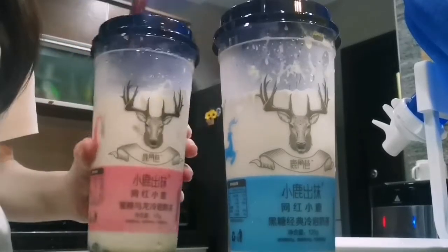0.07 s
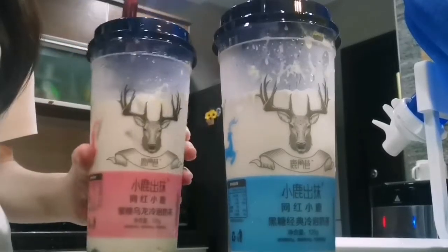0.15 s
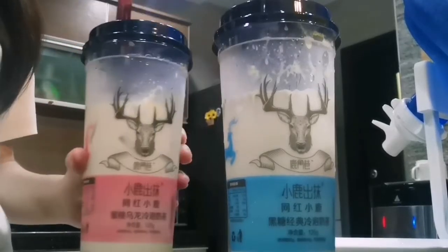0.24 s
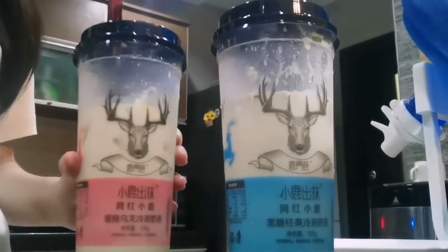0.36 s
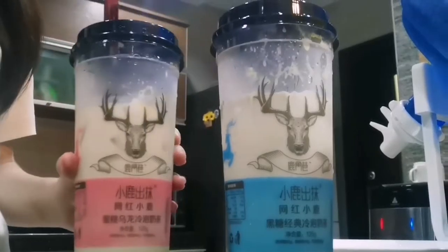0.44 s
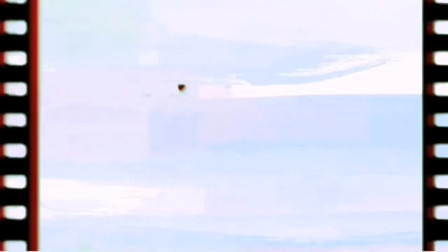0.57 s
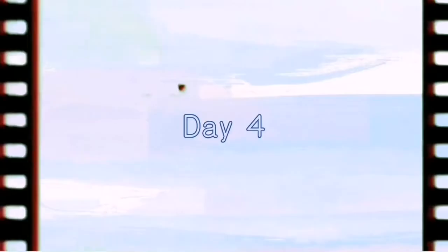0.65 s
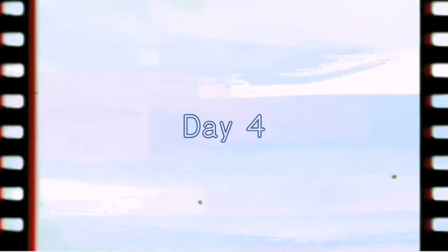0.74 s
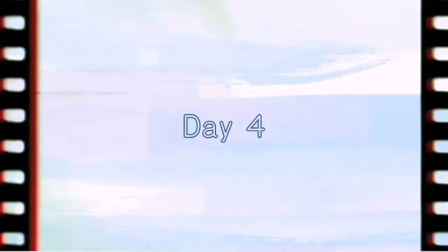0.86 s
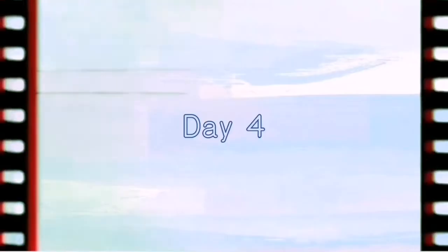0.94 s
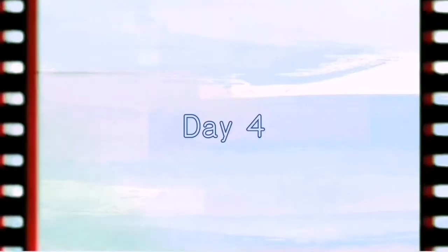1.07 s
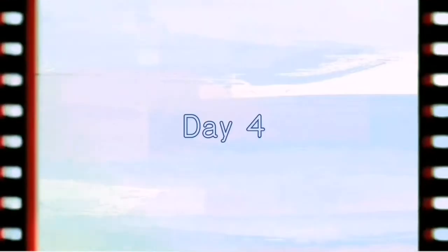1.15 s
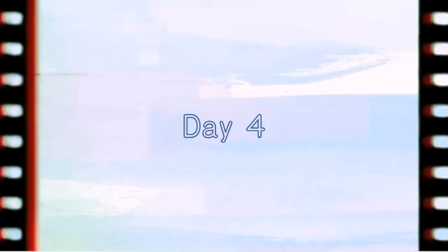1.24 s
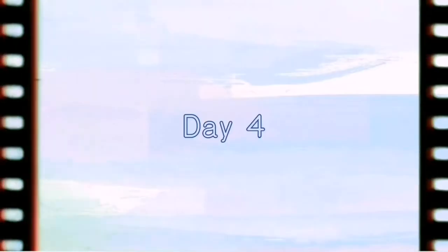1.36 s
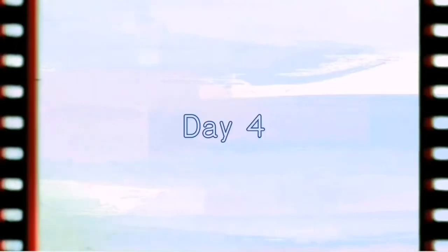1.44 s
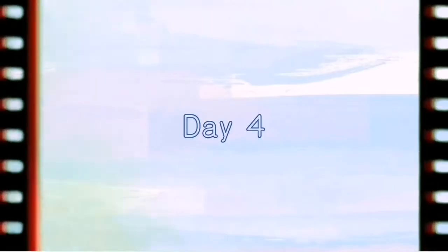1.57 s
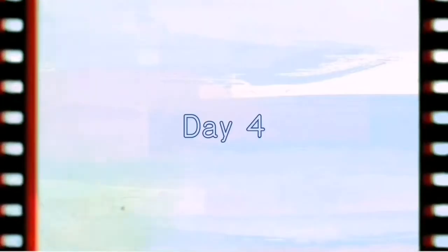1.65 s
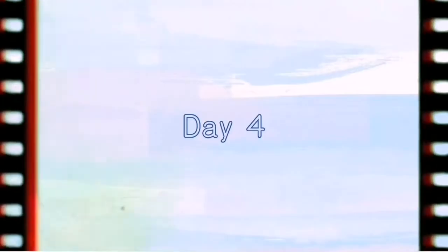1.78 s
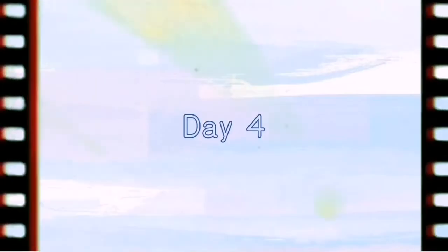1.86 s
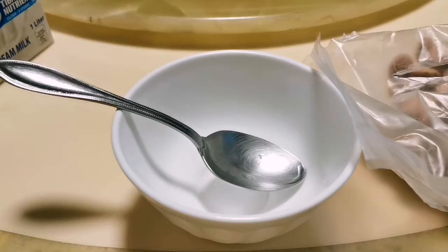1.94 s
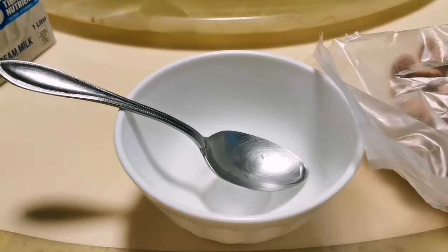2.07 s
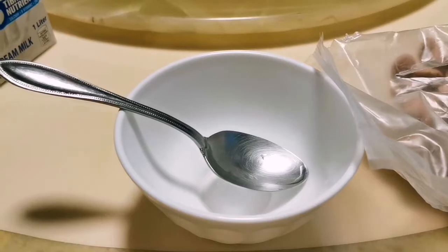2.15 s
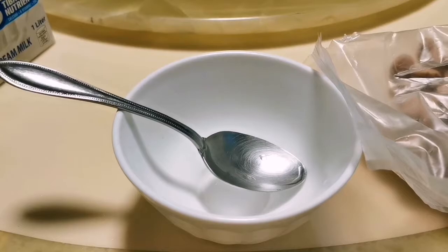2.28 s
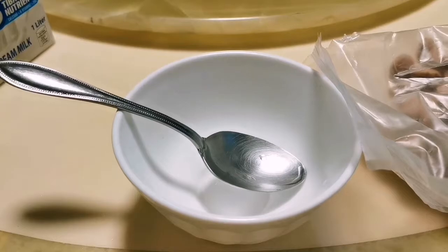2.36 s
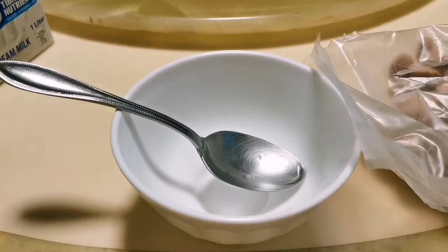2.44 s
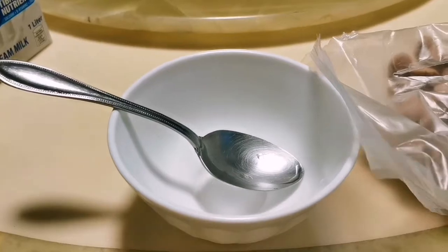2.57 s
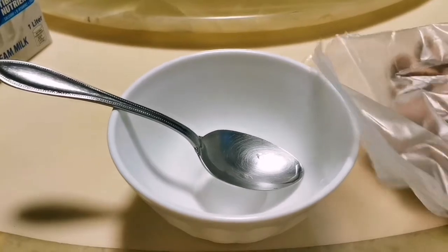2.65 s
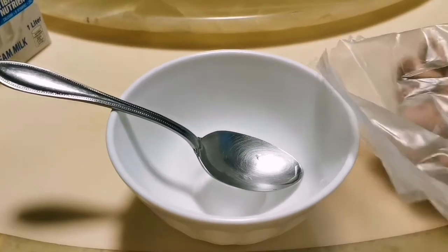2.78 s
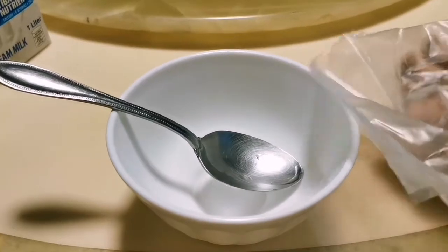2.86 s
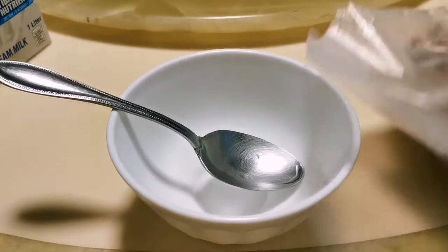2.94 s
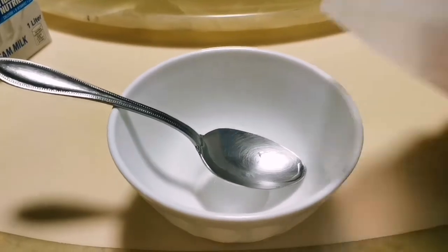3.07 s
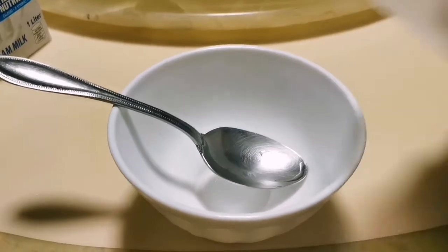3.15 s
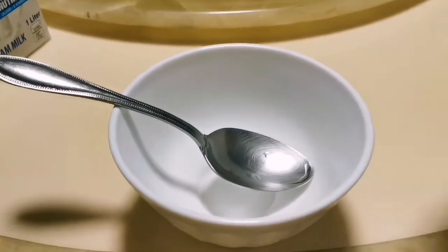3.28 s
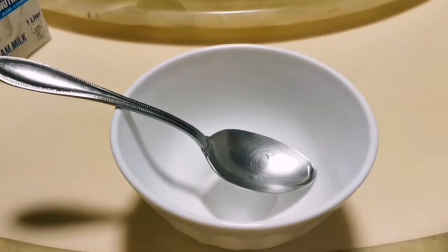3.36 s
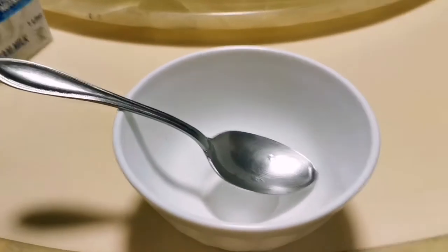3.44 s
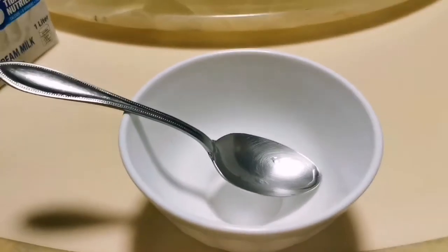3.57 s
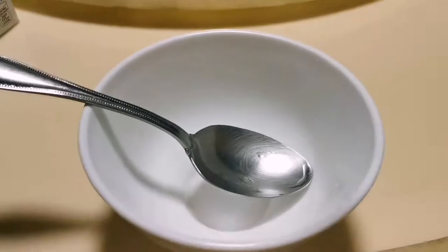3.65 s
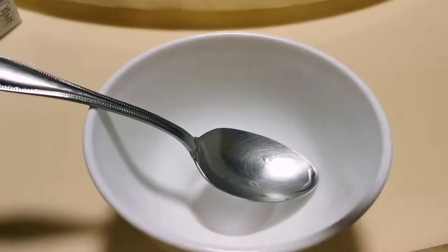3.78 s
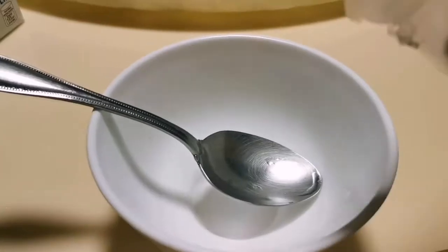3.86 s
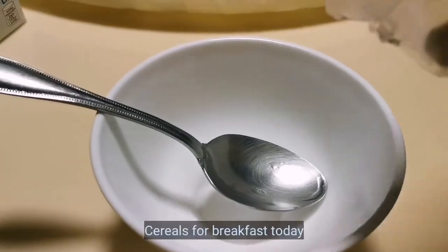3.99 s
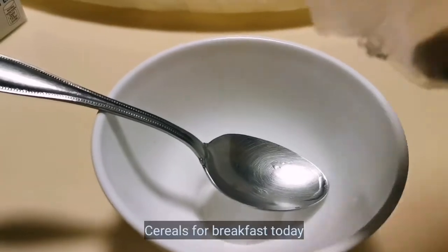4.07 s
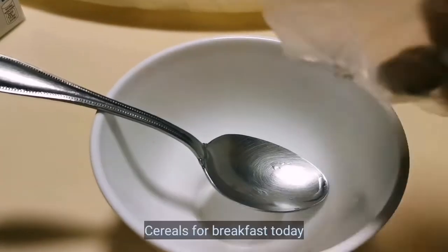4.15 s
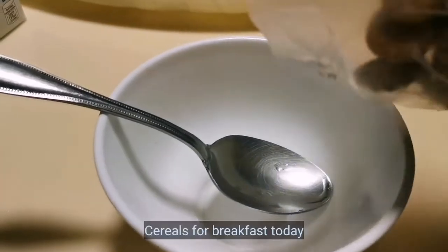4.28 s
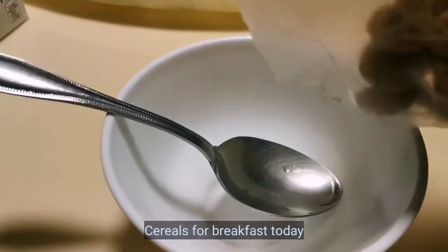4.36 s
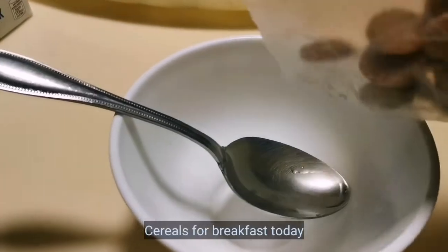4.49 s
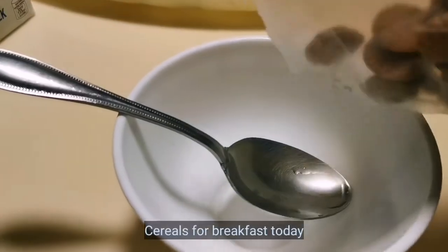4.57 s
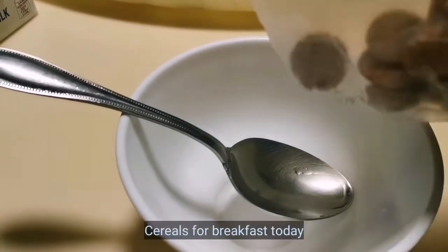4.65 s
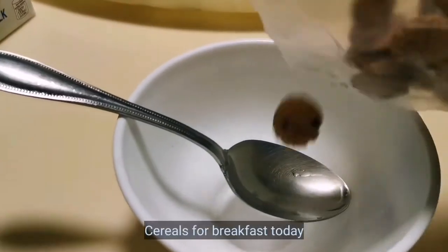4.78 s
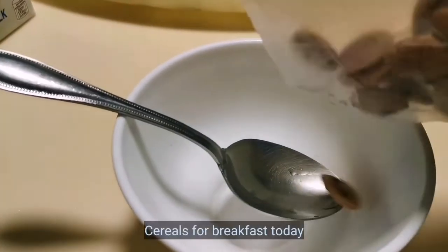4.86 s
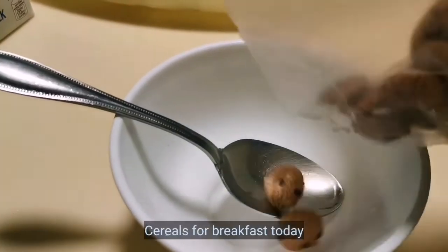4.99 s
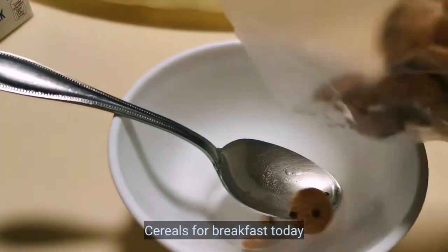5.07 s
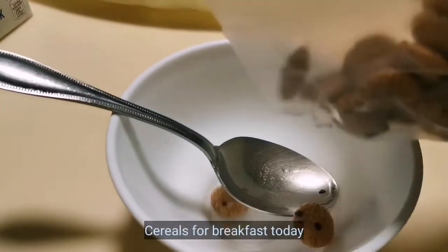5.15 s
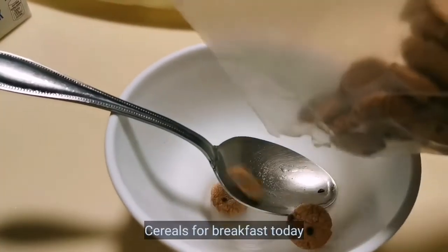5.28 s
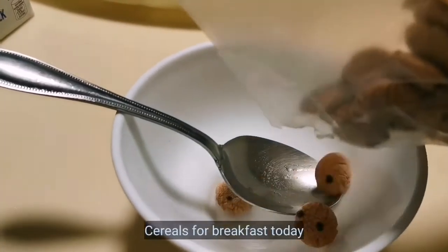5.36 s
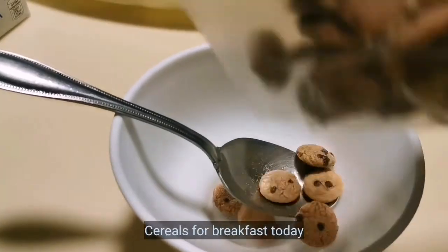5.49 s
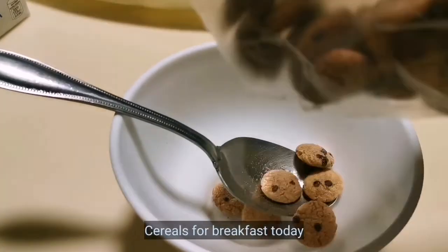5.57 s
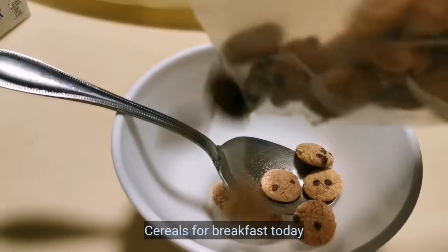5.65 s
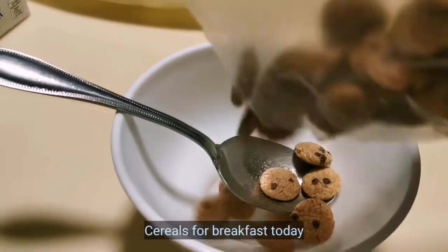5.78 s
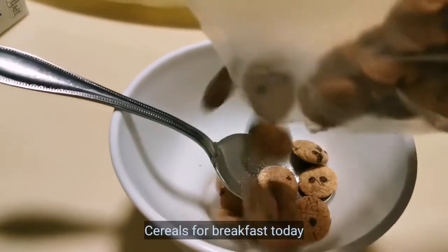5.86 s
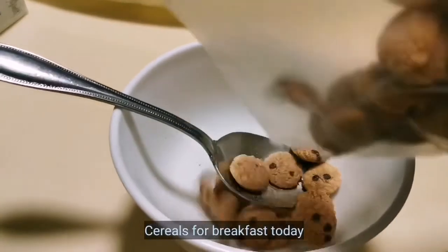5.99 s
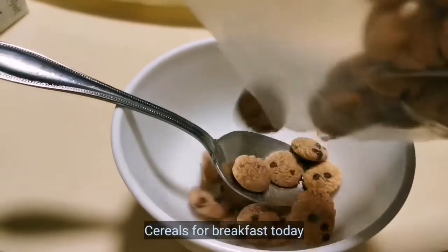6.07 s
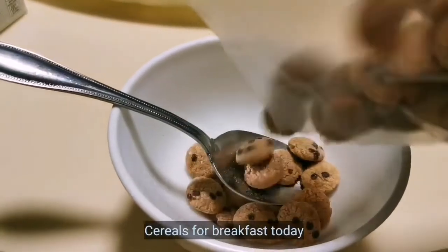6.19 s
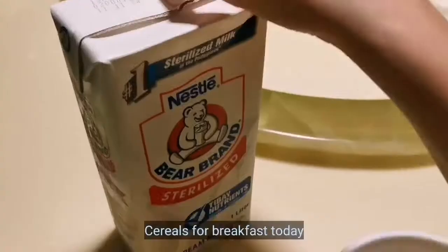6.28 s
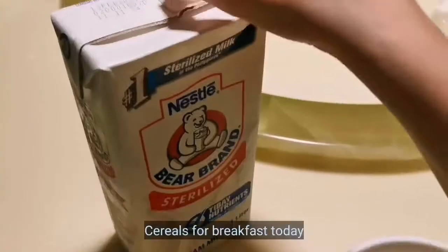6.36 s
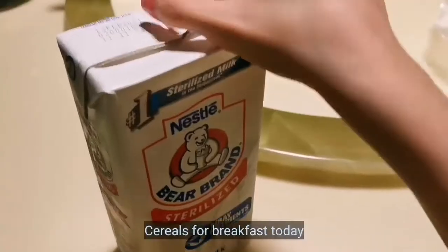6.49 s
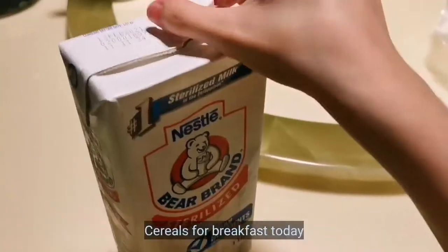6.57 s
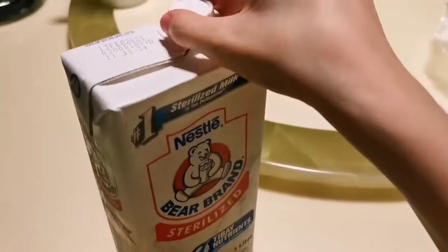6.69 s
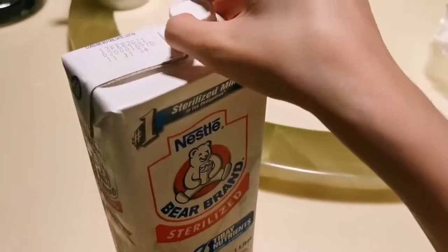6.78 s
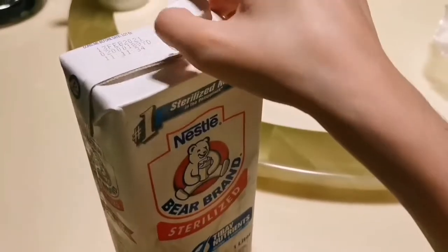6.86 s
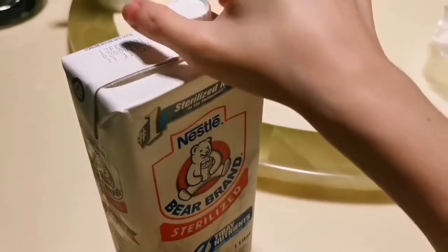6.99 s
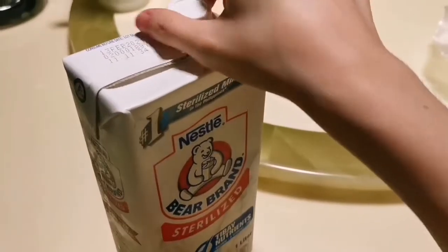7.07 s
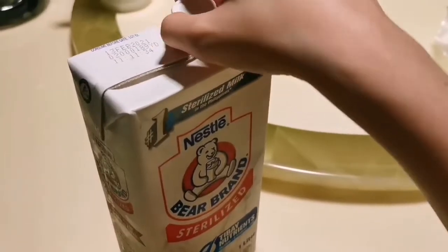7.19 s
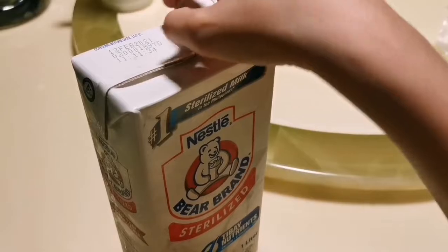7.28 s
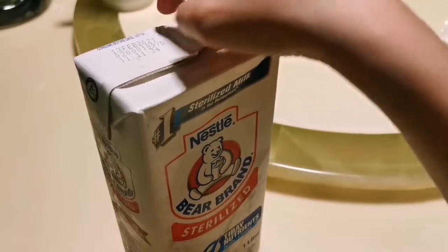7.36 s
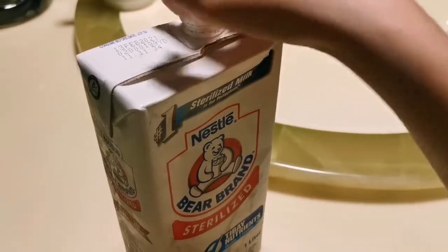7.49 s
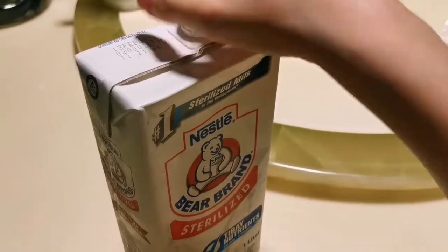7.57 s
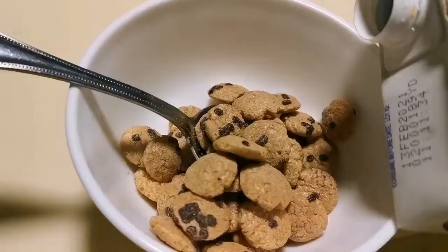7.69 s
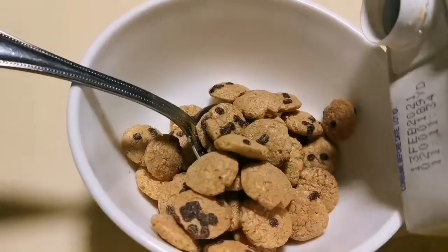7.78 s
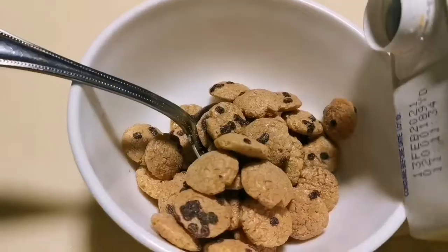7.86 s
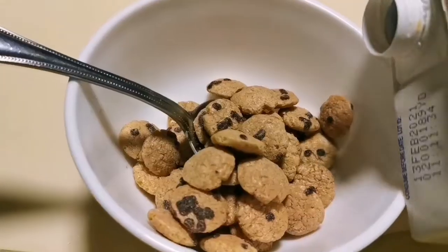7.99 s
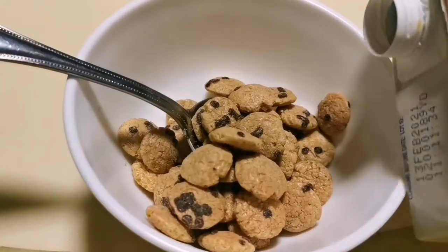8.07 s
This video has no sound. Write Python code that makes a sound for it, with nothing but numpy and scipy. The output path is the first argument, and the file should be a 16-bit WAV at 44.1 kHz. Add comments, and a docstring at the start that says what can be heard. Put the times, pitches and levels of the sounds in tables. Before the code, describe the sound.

Three close-miked scenes follow one another: squeaky handling of a plastic cup over low mains hum; a dry, centred mechanical click-clack with soft thuds; then a quiet, lightly reverberant kitchen. There, thin plastic rustles and snaps, biscuits tumble dully inside it and drop irregularly into a china bowl, chinking and faintly ringing a spoon. The pouring cuts off and dull carton taps, finger rubbing and short cap squeaks finish.

```python
"""A humming room, a quiet room and a kitchen, one after another. Room 1: a plastic cup is rubbed, creaks and
knocks (grains and cracks of noise). Room 2: a button clicks down and up (noise cracks, ringing spring).
Kitchen: a thin bag crinkles (grains), cereal biscuits drop into a ceramic bowl with a spoon in it (cracks
excite decaying modes), then fingers knock and rub a milk carton and its cap squeaks (resonated noise)."""
import sys
import numpy as np
from scipy import signal
from scipy.fft import rfft, irfft
from scipy.io import wavfile
from scipy.ndimage import uniform_filter1d

SR = 44100
rng = np.random.default_rng(int(sys.argv[2]) if len(sys.argv) > 2 else 0)


def generate_wav(signal):
    """Clip the signal to [-1, 1] and save it as 16-bit WAV at the path in sys.argv[1]."""
    frames = np.transpose(np.atleast_2d(signal))
    scaled = np.clip(frames, -1, 1) * 32767
    pcm = np.round(scaled).astype(np.int16)
    wavfile.write(sys.argv[1], SR, pcm)


N = 358533


def from_db(db):
    """Decibels to gain."""
    return 10 ** (np.asarray(db) / 20)


def rms_one(x):
    """Scale to unit rms."""
    return x / np.sqrt(np.mean(x ** 2) + 1e-20)


def during(start_s, end_s):
    """One between two moments, zero outside, with 4 ms linear fades."""
    t = np.arange(N) / SR
    return np.clip(np.minimum(t - start_s, end_s - t) / .004, 0, 1)


def swell(middle_s, half_s):
    """Gaussian stroke that gathers strength and fades again; height 1."""
    return np.exp(-((np.arange(N) / SR - middle_s) / half_s) ** 2)


def gains(rows):
    """Rows of (t/s, level/dB, ..) as gain curves, silent outside their span."""
    s, *columns = np.transpose(rows)
    t = np.arange(N) / SR
    return [from_db(np.interp(t, s, c)) * during(s[0], s[-1]) for c in columns]


def dulled(x, hz):
    """One-pole low-pass."""
    return signal.lfilter(*signal.butter(1, min(hz, SR / 2 - 1), fs=SR), x)


def banded(x, hz, octaves):
    """Gentle band-pass around a pitch."""
    edges_hz = hz * 2 ** (np.array([-.5, .5]) * octaves)
    edges_hz = np.minimum(edges_hz, [.4 * SR, .48 * SR])
    return signal.lfilter(*signal.butter(1, edges_hz, "band", fs=SR), x)


def coloured(x, spectrum, size=4096):
    """Minimum-phase filter of unit power gain with the given spectrum (one dB column, or one a channel)."""
    hz, *columns = np.transpose(spectrum)
    log_hz = np.log(hz)
    grid = np.log(np.maximum(np.fft.rfftfreq(size, 1 / SR), 1))
    # 12 dB/octave roll-off beyond either end
    beyond = np.maximum(log_hz[0] - grid, 0) + np.maximum(grid - log_hz[-1], 0)
    log_gains = [np.log(from_db(np.interp(grid, log_hz, c))) - 2 * beyond for c in columns]
    # folding the cepstrum makes the filter causal
    cepstrum = irfft(log_gains)
    cepstrum[:, 1:size // 2] *= 2
    cepstrum[:, size // 2 + 1:] = 0
    response = rms_one(irfft(np.exp(rfft(cepstrum)))) / np.sqrt(size)
    return signal.oaconvolve(np.atleast_2d(x), response, axes=1)[:, :N]


def clicks(times_s, heights):
    """One impulse for each event."""
    return np.bincount(np.round(np.asarray(times_s) * SR).astype(int), heights, N)


def ring(x, hz, t60_s):
    """Two-pole resonator: a unit click sets a decaying sine of height 1 ringing."""
    r, w = from_db(-60 / (t60_s * SR)), 2 * np.pi * hz / SR
    return signal.lfilter([0, np.sin(w)], [1, -2 * r * np.cos(w), r * r], x + 1e-18)


def burst(t60_s, channels=2):
    """A crack: noise that builds over its first instants and dies away."""
    age = np.arange(SR // 8) / SR / t60_s
    noise = rng.standard_normal((channels, len(age)))
    return noise * from_db(-60 * age) * np.tanh(age / 0.0091)


def bursts(times_s, levels_db, t60_s, channels=2, pitches_hz=None, octaves=0.18):
    """A fresh crack for each event; given pitches, its energy gathers around its own note."""
    out = np.zeros((channels, N + SR))
    for k, (s, db) in enumerate(zip(times_s, levels_db)):
        crack, at = burst(t60_s, channels), round(s * SR)
        if pitches_hz is not None:
            crack = crack.std() * rms_one(banded(crack, pitches_hz[k], octaves))
        out[:, at:at + crack.shape[1]] += from_db(db) * crack
    return out[:, :N]


def grains(level, per_s, spread_db, t60_s, pitches_hz=np.geomspace(300, 15000, 14)):
    """Clumps of tiny uneven cracks, each about an octave wide at one of many pitches; rms follows the level."""
    first, last = np.flatnonzero(level > level.max() / 1000)[[0, -1]]
    n, out = last - first, np.zeros((2, N))
    sizes = from_db(spread_db * np.minimum(rng.exponential(1, n), 4)) * rng.choice([-1, 1], n)
    clumps = from_db(4 * rms_one(uniform_filter1d(rng.standard_normal(n), size=500)))
    born = sizes * (rng.random(n) < clumps * per_s / SR)
    pitch_index = rng.integers(0, len(pitches_hz), n)
    cracks = np.zeros((2, n))
    for k, hz in enumerate(pitches_hz):
        crack = banded(burst(t60_s)[:, :SR // 40], hz, 1)
        cracks += signal.oaconvolve([born * (pitch_index == k)], crack, axes=1)[:, :n]
    out[:, first:last] = rms_one(cracks)
    return level * out


def narrowed(pair, split_hz=1300):
    """Two unrelated signals become a stereo image: long waves reach both ears alike."""
    mid, side = pair
    side = side - dulled(side, split_hz)
    return np.array([mid + side, mid - side])


def in_room(x, wet_db, dull_hz, t60_s):
    """Direct sound plus a short diffuse tail that the walls dull."""
    t = np.arange(SR // 2) / SR
    tail = narrowed(rng.standard_normal((2, len(t)))) * from_db(-60 * t / t60_s) * (t > .005)
    tail = dulled(rms_one(tail) / np.sqrt(len(t)), dull_hz)
    return x + from_db(wet_db) * signal.oaconvolve(np.atleast_2d(x), tail, axes=1)[:, :N]


def room_tone(air, air_db, hum):
    """Still air as coloured noise, mains hum as steady sines."""
    t = np.arange(N) / SR
    mains = sum(np.sqrt(2) * from_db(db) * np.sin(2 * np.pi * (hz * t + rng.random())) for hz, db in hum)
    noise = narrowed(rng.standard_normal((2, N)), split_hz=347)
    return mains + from_db(air_db) * coloured(noise, air)


def thumps(rows):
    """Hollow knocks: sines that swell over a rise time and fade."""
    out = 0
    for s, db, rise_s, hz in rows:
        t = np.maximum(np.arange(N) / SR - s, 0)
        envelope = t / rise_s * np.exp(1 - t / rise_s)
        out = out + from_db(db) * envelope * np.sin(2 * np.pi * hz * t)
    return out


# air spectrum: f/Hz, relative density/dB
CUP_AIR = [(30, -3.5), (118, -5), (913, -19), (16000, -48)]
CUP_AIR_DB = -54.5
# mains hum: f/Hz, level/dB rms
CUP_HUM = [(59.2, -60.5), (118.4, -55), (177.6, -59), (236, -62)]
# fingers sliding on the cup: t/s, level/dB
CUP_RUB = [(0, -46), (.07, -54), (.12, -42.5), (.17, -55), (.235, -42.5), (.3, -53), (.5, -80)]
# wall creaks: t/s, level/dB, f/Hz
CUP_CREAKS = [(0.012, -42.5, 2580), (0.043, -37, 2650), (0.116, -39.5, 4340), (0.241, -33, 4370)]
# cup body spectrum: f/Hz, relative density/dB
CUP_BODY = [(150, -43), (250, -11), (443, -0.5), (653, -13.5), (799, -2), (1370, -14), (1710, -10.5),
            (2090, -24), (2550, -11), (3130, -20.5), (4930, -21.5), (14000, -57.5)]
# hollow knocks: start t/s, level/dB, rise/s, f/Hz
CUP_KNOCKS = [(0.095, -39, 0.011, 438), (0.232, -45, 0.011, 800)]


def cup():
    """Fingers stick and slip on a full plastic cup: grains shaped by its body, pitched creaks, knocks."""
    slips = grains(gains(CUP_RUB)[0], per_s=1100, spread_db=3.5, t60_s=0.0031)
    rub = coloured(narrowed(slips), CUP_BODY)
    s, db, hz = np.transpose(CUP_CREAKS)
    creaks = narrowed(bursts(s, db, t60_s=0.0095, pitches_hz=hz, octaves=0.12))
    handling = in_room(rub + creaks + thumps(CUP_KNOCKS), wet_db=-7.5, dull_hz=5970, t60_s=0.085)
    return handling + room_tone(CUP_AIR, CUP_AIR_DB, CUP_HUM)


# air spectrum: f/Hz, relative density/dB
BUTTON_AIR = [(25, -1.5), (200, -7), (1500, -31), (4500, -38), (8800, -31.5), (16000, -40.5)]
BUTTON_AIR_DB = -72
# mains hum: f/Hz, level/dB rms
BUTTON_HUM = [(121, -71)]
# housing knocks: t/s, level/dB
BUTTON_KNOCKS = [(0.746, -25.5), (0.773, -30), (0.7854, -33), (0.8523, -25), (0.865, -31.5), (0.869, -24.5),
                 (0.889, -20.5), (0.95, -44.5)]
# spring snaps over: t/s, crack level/dB, lower ring level/dB, upper ring level/dB
BUTTON_SNAPS = [(0.7527, -21, -20, -5), (0.8902, -16.5, -7.5, -9)]
# the spring's two rings: f/Hz, t60/s
SPRING = [(8200, 0.0072), (11100, 0.0064)]
THUD_LOWPASS_HZ = 260
HISS_S, HISS_HALF_S, HISS_DB, HISS_HZ = 1.27, 0.11, -74.5, 7800


def button():
    """The housing knocks softly, the spring snaps going down and coming up, a faint hiss follows; mono."""
    s, crack_db, *rings_db = np.transpose(BUTTON_SNAPS)
    snap = bursts(s, crack_db, t60_s=0.016)[0]
    for db, (hz, t60_s) in zip(rings_db, SPRING):
        snap += ring(clicks(s, from_db(db)), hz, t60_s)
    # a wall sends the snap back
    snap += from_db(-35.5) * np.roll(snap, round(0.014 * SR))
    # a soft push swells over a cycle or two before it dies
    t = np.arange(SR // 20) / SR
    age = t / 0.0018
    push = age * np.exp(1 - age) * np.sin(2 * np.pi * 715 * t)
    knock_s, knock_db = np.transpose(BUTTON_KNOCKS)
    knocks = signal.oaconvolve(clicks(knock_s, from_db(knock_db)), push)[:N]
    thud = from_db(1) * dulled(bursts(knock_s, knock_db, t60_s=0.1), THUD_LOWPASS_HZ)
    heard = in_room(snap + knocks + thud, wet_db=-36, dull_hz=7000, t60_s=0.19)
    hiss = rms_one(banded(rng.standard_normal(N), HISS_HZ, 0.89))
    heard = heard + from_db(HISS_DB) * swell(HISS_S, HISS_HALF_S) * hiss
    return (heard + room_tone(BUTTON_AIR, BUTTON_AIR_DB, BUTTON_HUM))[0]


# air spectrum: f/Hz, relative density/dB
KITCHEN_AIR = [(25, 0), (250, -5), (800, -32.5), (4500, -37.5), (8500, -47.5), (16000, -43)]
KITCHEN_AIR_DB = -62
# mains hum: f/Hz, level/dB rms
KITCHEN_HUM = [(120, -69.5)]


def kitchen_tone():
    """Still air and mains hum of the kitchen."""
    return room_tone(KITCHEN_AIR, KITCHEN_AIR_DB, KITCHEN_HUM)


def kitchen(x):
    """The small hard-walled room."""
    return in_room(x, wet_db=-6.5, dull_hz=11000, t60_s=0.3)


# bag grasped and lifted: t/s, crinkling level/dB
LIFT = [(2.52, -62), (2.708, -62), (2.774, -46.5), (2.854, -52), (3.044, -52.5), (3.258, -58.5),
        (3.456, -58.5), (3.702, -51), (3.97, -67)]
# bag shaken over the bowl: middle t/s, half length/s, crinkling level/dB, tumbling level/dB
SHAKES = [(4.077, 0.08, -58, -55.5), (4.427, 0.12, -54.5, -46), (4.652, 0.071, -53.5, -48.5),
          (4.856, 0.15, -53.5, -48), (5.255, 0.13, -55.5, -64), (5.703, 0.12, -54, -46),
          (6.04, 0.26, -52, -55.5), (6.425, 0.051, -54.5, -46)]
HELD_DB = -69.5   # rustle between shakes
LIFT_TUMBLE_DB = -1   # tumbling relative to the lift's crinkling


def bag_motion():
    """Gains of crinkling and tumbling as the bag is lifted, held and shaken; powers add."""
    lift = gains(LIFT)[0]
    held = from_db(HELD_DB) * during(SHAKES[0][0], SHAKES[-1][0])
    crinkling = lift ** 2 + held ** 2
    tumbling = (from_db(LIFT_TUMBLE_DB) * lift) ** 2
    for s, half_s, crinkle_db, tumble_db in SHAKES:
        crinkling = crinkling + (from_db(crinkle_db) * swell(s, half_s)) ** 2
        tumbling = tumbling + (from_db(tumble_db) * swell(s, half_s)) ** 2
    return np.sqrt(crinkling), np.sqrt(tumbling)


# single creases snap: t/s, level/dB, f/Hz of the note
BAG_SNAPS = [(2.62, -39, 3940), (2.6698, -29.5, 1330), (2.7671, -38, 1090), (2.957, -34, 6750),
             (2.985, -34.5, 3870), (3.034, -32, 6500), (3.048, -34, 4700), (3.1848, -34, 4600),
             (3.3847, -37, 1450), (3.496, -30.5, 3820), (3.514, -32, 7000), (3.9192, -36, 3620),
             (4.3307, -34.5, 6550), (4.351, -33.5, 4070), (4.4434, -33.5, 2940), (4.6797, -34, 1160),
             (4.784, -34.5, 6650), (4.812, -36, 1820)]
# film spectrum: f/Hz, relative left/dB, relative right/dB
FILM = [(344, -2, 2), (816, -8, -4.5), (1154, 0.5, 4.5), (1790, -5.5, -6), (4960, -9, -1.5),
        (5700, -15, -6.5), (6750, -17, 0.5), (7940, -11, -12.5), (14400, -17.5, -16)]


def bag(crinkling):
    """Thin film buckles in countless small cracks and a few loud snaps, each with its own note."""
    cracks = grains(crinkling * from_db(2.0), per_s=1300, spread_db=4.0, t60_s=0.0076)
    s, db, hz = np.transpose(BAG_SNAPS)
    notes = narrowed(bursts(s, db, t60_s=0.037, pitches_hz=hz))
    notes = from_db(-6) * notes * from_db([[-4], [0]])
    snaps = bursts(s, db, t60_s=0.017)
    left, right = coloured(narrowed(cracks + snaps), FILM) + notes
    # the bag is held on the right, so the left ear hears it later
    return np.array([np.roll(left, round(.0003 * SR)), right])


def jostle(level, low_hz, high_hz):
    """Soft collisions, each with its own pitch in one dull band; level sets their envelope."""
    pitches_hz = np.geomspace(low_hz, high_hz, 5)
    knocks = grains(level, per_s=400, spread_db=2.5, t60_s=0.0022, pitches_hz=pitches_hz)
    return dulled(narrowed(knocks), 2 * high_hz)


# hands shift their grip, the last row a knock on the carton: start t/s, level/dB, rise/s, f/Hz
BUMPS = [(3.852, -38, 0.0032, 447), (4.41, -44, .004, 443), (4.885, -40, 0.0058, 171),
         (5.785, -36, 0.0087, 138.9), (6.745, -40, 0.023, 129), (8.034, -32.5, 0.0027, 303)]
TUMBLE_LOW_HZ, TUMBLE_HIGH_HZ = 126, 380


def bumps(tumbling):
    """Biscuits tumble inside the bag; each change of grip, and a last knock on the carton, is a dull thump."""
    return (jostle(tumbling, TUMBLE_LOW_HZ, TUMBLE_HIGH_HZ) + thumps(BUMPS)) * from_db([[-2.5], [0]])


# biscuits land: t/s, tick level/dB, bowl ring level/dB
DROPS = [(4.9708, -29.5, -31), (5.029, -30, -37.5), (5.1332, -31, -37), (5.4335, -31.5, -34),
         (5.5156, -36, -37.5), (5.5852, -35.5, -36), (5.842, -32.5, -38), (5.9494, -37.5, -39.5),
         (5.98, -29, -30), (6.0192, -32.5, -33), (6.0773, -35, -33.5), (6.133, -35, -42),
         (6.2933, -35, -35.5), (6.448, -33.5, -43), (6.4874, -36.5, -34.5)]
HOP_S, HOP_LOSS_DB, HOP_RING_LOSS_DB = .009, 3.5, 6.5   # mean time in the air, loss of tick and of ring


def landings():
    """Each biscuit lands and hops once: times, tick levels and ring levels of all contacts."""
    first = np.array(DROPS)
    hop = first + [0, -HOP_LOSS_DB, -HOP_RING_LOSS_DB]
    hop[:, 0] += HOP_S * rng.uniform(.7, 1.3, len(first))
    return np.concatenate([first, hop]).T


# dry biscuit's tick spectrum: f/Hz, relative left/dB, relative right/dB
TICK = [(534, -45, -22), (1130, 3, 4.5), (2580, 9, 9), (2980, 3, 0), (5000, 4, 13), (9700, 10, -27),
        (12300, 4.5, -25), (15800, -13, -37)]
# bowl modes: f/Hz, relative level/dB, t60/s
BOWL = [(1056, -19.5, 0.53), (1119, 0, 0.058), (1200, -15, 0.13), (1308, -18.5, 0.17), (2284, -15, 0.05),
        (4368, -8.5, 0.1), (5040, -3, 0.043), (5490, -13, 0.091), (6710, 6.5, 0.04), (6820, 5, 0.033),
        (7640, -14, 0.13), (11690, -10, 0.06)]
# glancing edge contacts: t/s, level/dB, f/Hz
CHINKS = [(5.142, -36.5, 9800), (5.438, -28.5, 10900), (5.876, -27, 9700)]
SKITTER_DB, SKITTER_T60_S = -21, 0.17   # level relative to the tick, decay


def bowl(crinkling):
    """Biscuits tick, skitter, chink and rattle; the contacts set the bowl's modes ringing."""
    s, tick_db, ring_db = landings()
    ticks = bursts(s, tick_db, t60_s=0.018)
    skitter_starts = clicks(s, from_db(tick_db + SKITTER_DB))
    skitter = signal.lfilter([1], [1, -from_db(-60 / (SKITTER_T60_S * SR))], skitter_starts + 1e-18)
    # as long as biscuits fall, shaking the bag harder makes the small collisions louder
    rattle_level = np.hypot(skitter, crinkling * during(s[0], s[-1]))
    rattle = grains(rattle_level, per_s=780, spread_db=7.0, t60_s=0.012)
    contacts = bursts(s, ring_db, t60_s=0.043)
    chatter = narrowed(from_db(-25.0) * contacts + from_db(-31.0) * rattle)
    # each contact falls on another spot and favours other modes
    china = 0
    for hz, db, t60_s in BOWL:
        spot_gains = from_db(rng.normal(0, 2.5, len(s)))
        spot = np.interp(np.arange(N) / SR, np.sort(s), spot_gains)
        china = china + from_db(db) * ring(chatter * spot, hz, t60_s)
    chink_s, chink_db, chink_hz = np.transpose(CHINKS)
    chinks = bursts(chink_s, chink_db, t60_s=0.015, channels=1, pitches_hz=chink_hz, octaves=0.16)
    left, right = coloured(ticks + rattle, TICK) + chinks + china + spoon()
    # the bowl stands a little to the left
    return np.array([left, np.roll(right, round(.00012 * SR))])


# biscuits hit the spoon squarely: t/s, level/dB
SPOON_HITS = [(4.971, -53.5), (5.029, -50), (5.517, -53.5), (5.843, -54), (6.487, -53)]
# spoon modes: f/Hz, relative level/dB, undamped t60/s
SPOON = [(9183, 10, 0.75), (12747, 4, 0.2)]
SPOON_DAMPING_PER_S2 = 1.1


def spoon():
    """The spoon's modes sing at each hit, more briefly as biscuits pile up on it."""
    out = 0
    for s, hit_db in SPOON_HITS:
        damping = 1 + SPOON_DAMPING_PER_S2 * (s - SPOON_HITS[0][0]) ** 2
        for hz, db, t60_s in SPOON:
            out = out + ring(clicks([s], from_db([hit_db + db])), hz, t60_s / damping)
    return out * from_db([[2], [-10]])


# cap and carton knock: t/s, level/dB, low-pass f/Hz
CARTON_KNOCKS = [(6.716, -39.5, 1720), (6.811, -42.5, 3030), (6.9701, -36, 1170), (7.2202, -32.5, 2620),
                 (7.563, -44.5, 3000), (7.599, -49, 2000), (7.928, -45.5, 1990)]
# cap squeaks as it turns: middle t/s, half length/s, level/dB, f/Hz
SQUEAKS = [(7.06, 0.058, -64, 800), (7.479, 0.026, -50.5, 464), (7.939, 0.016, -50.5, 480)]
# carton spectrum: f/Hz, relative density/dB
CARTON_BODY = [(120, 6), (300, -2.5), (500, 6.5), (720, -8), (1050, -3), (1700, -18), (4800, -22.5),
               (15000, -38.5)]
# pouring fades out: start t/s, end t/s
POUR_FADE = (6.51, 6.58)
GRIP_DB = -66.5   # steady rubbing of the fingers
SLIDE_DB, SLIDE_LAG_S, SLIDE_HALF_S = -35, 0.04, 0.059   # level relative to the knock
CLICK_S, CLICK_DB, CLICK_HZ = 6.603, -39.5, 9000   # tiny sharp click before the first carton knock


def carton():
    """Fingers knock on a full, dull carton and slide on after each knock; its cap squeaks and groans."""
    rubbing = from_db(GRIP_DB) * during(POUR_FADE[0], KITCHEN_SCENE[1])
    for s, db, _ in CARTON_KNOCKS:
        rubbing = rubbing + from_db(db + SLIDE_DB) * swell(s + SLIDE_LAG_S, SLIDE_HALF_S)
    touch = grains(rubbing, per_s=2500, spread_db=1.5, t60_s=0.0017)
    for s, db, lowpass_hz in CARTON_KNOCKS:
        touch += dulled(bursts([s], [db], t60_s=0.047), lowpass_hz)
    squeaks = 0
    for s, half_s, db, hz in SQUEAKS:
        tone = rms_one(ring(rng.standard_normal(N), hz, t60_s=0.042))
        squeaks = squeaks + from_db(db) * swell(s, half_s) * tone
    click = bursts([CLICK_S], [CLICK_DB], t60_s=0.0029, channels=1, pitches_hz=[CLICK_HZ], octaves=2.5)
    return coloured(narrowed(touch, split_hz=940), CARTON_BODY) + squeaks + click


# each scene: start t/s, end t/s
CUP_SCENE = (0, .65)
BUTTON_SCENE = (.742, 1.982)
KITCHEN_SCENE = (2.212, 8.2)


def scene():
    """The three scenes, one after another; the pouring fades out quickly before the carton knocks."""
    crinkling, tumbling = bag_motion()
    pour_gain = np.interp(np.arange(N) / SR, POUR_FADE, [1, 0])
    pour = kitchen(bag(crinkling) + bowl(crinkling)) * pour_gain
    breakfast = pour + kitchen(bumps(tumbling) + carton()) + kitchen_tone()
    return cup() * during(*CUP_SCENE) + button() * during(*BUTTON_SCENE) + breakfast * during(*KITCHEN_SCENE)


CUTOFF_HZ = 16200


def record(dry):
    """Steep elliptic low-pass cuts the top."""
    return signal.sosfilt(signal.ellip(10, .1, 80, CUTOFF_HZ, fs=SR, output="sos"), dry)


dry = scene()
out = record(dry)
generate_wav(out)
```